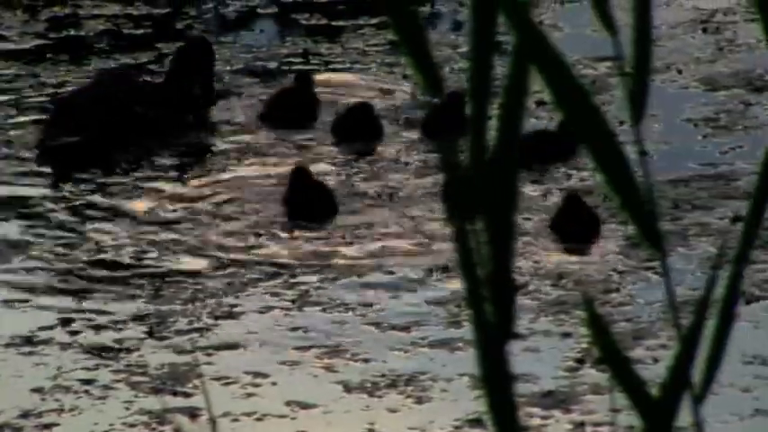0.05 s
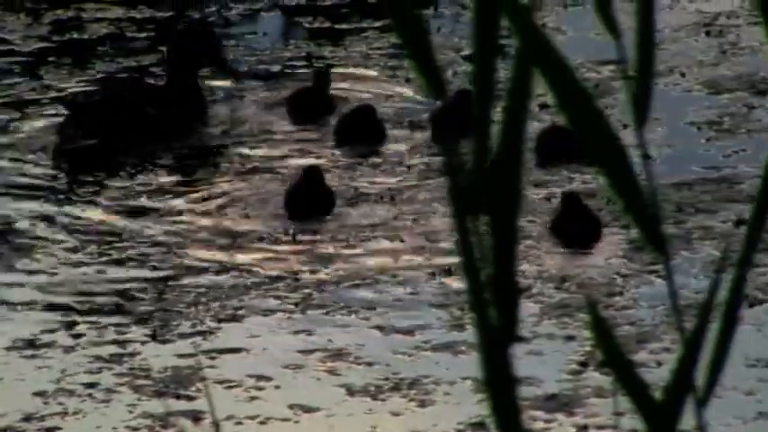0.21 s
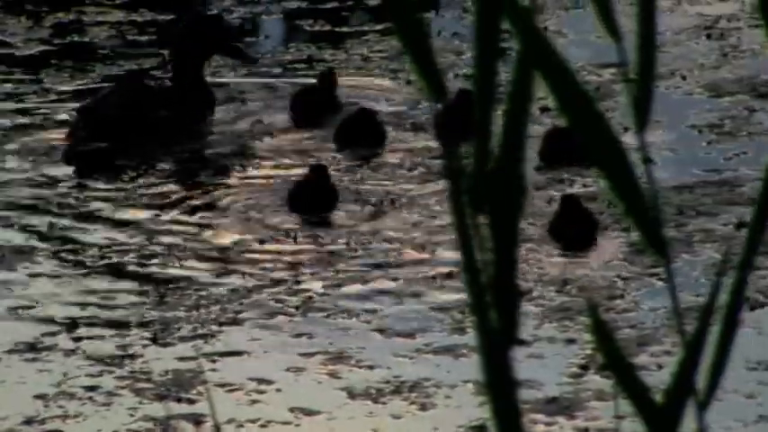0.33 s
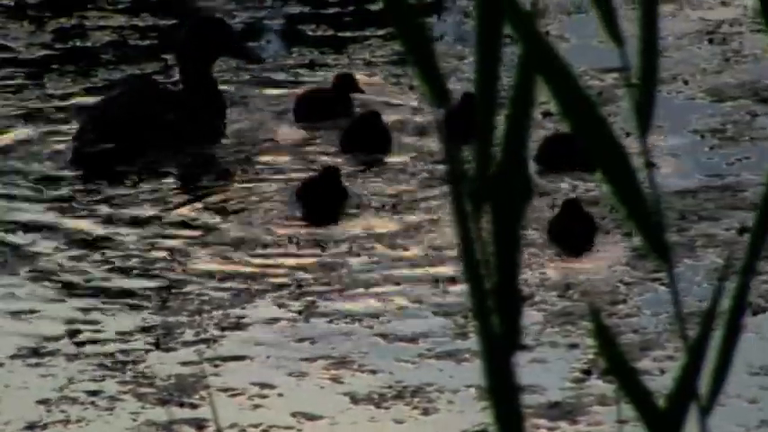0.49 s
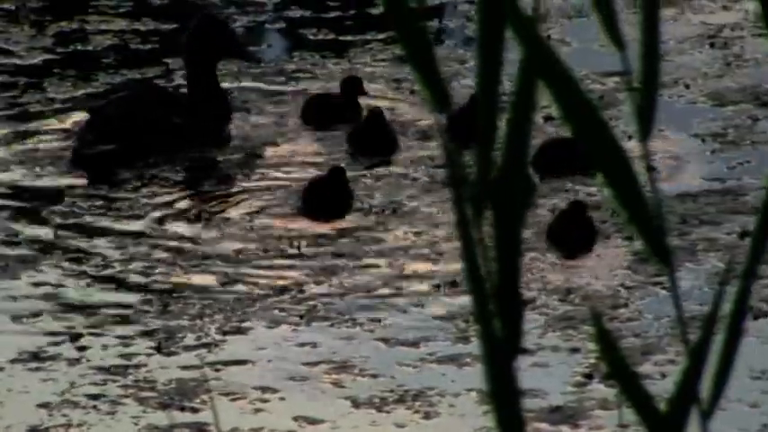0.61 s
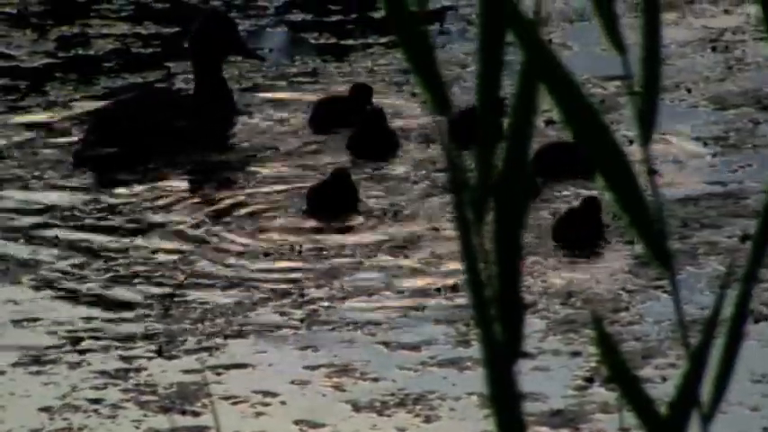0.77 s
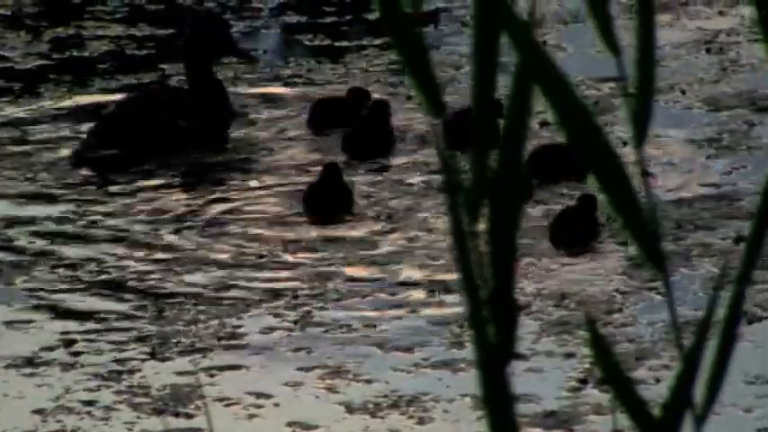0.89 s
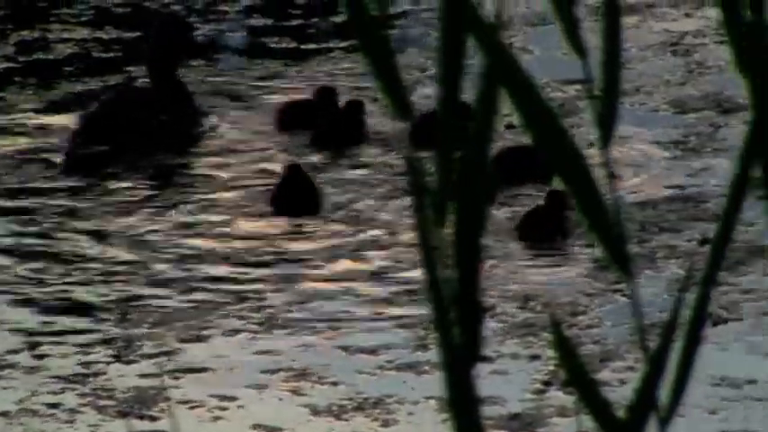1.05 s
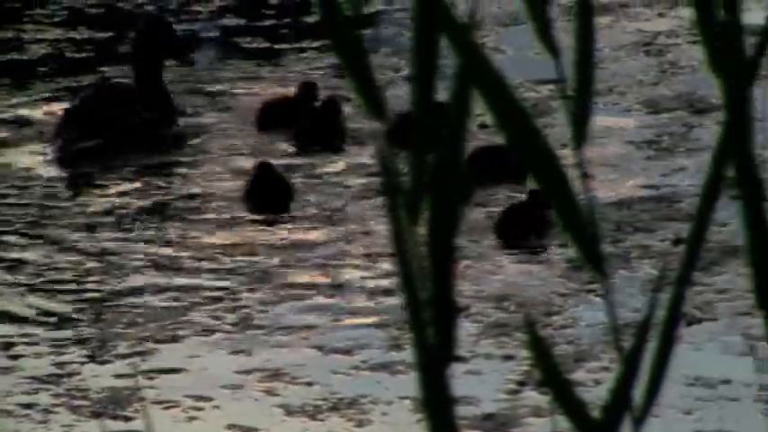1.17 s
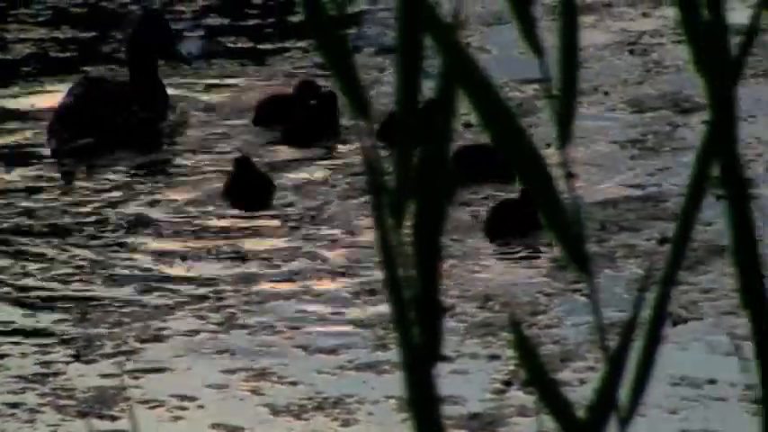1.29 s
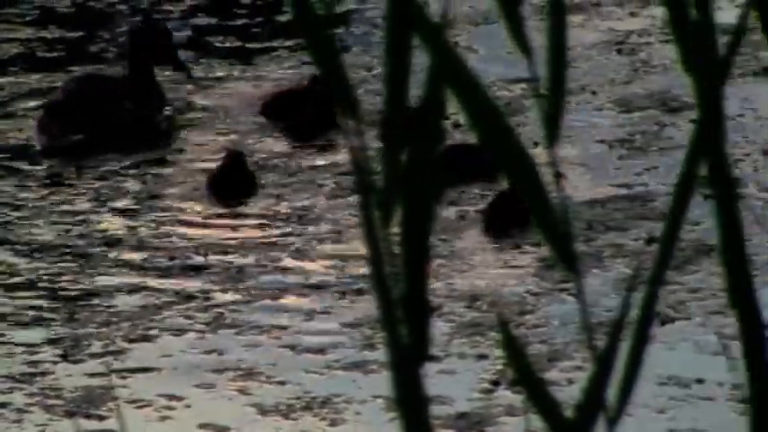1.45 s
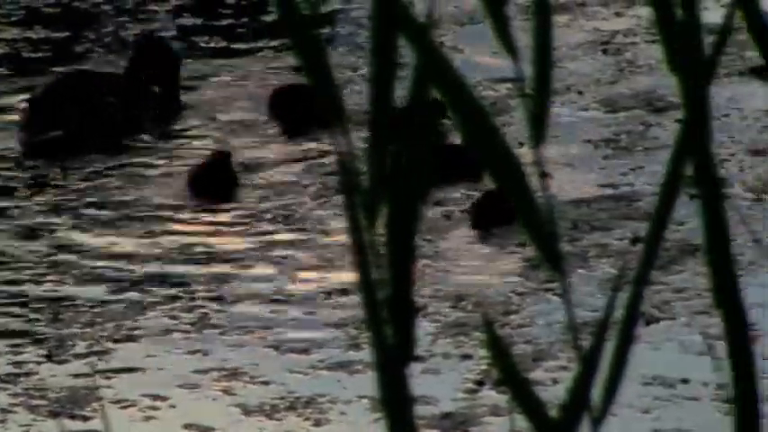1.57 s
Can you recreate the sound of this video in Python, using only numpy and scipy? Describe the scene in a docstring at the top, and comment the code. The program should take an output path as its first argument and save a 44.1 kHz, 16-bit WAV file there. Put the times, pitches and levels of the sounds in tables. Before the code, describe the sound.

Birdsong fills a reedy pond at dusk: a fluting singer warbles over quick sharp chips and thin whistles, while distant birds thicken later. Faint traffic hum, hiss and low breeze rumble surround the outdoor stereo microphones.

```python
"""Dusk at a reedy pond, with chips, slides and whistles from the start over traffic hum, blurred chorus and hiss.
A fluting singer, heard as near-sines on pitch paths, soon enters; a neighbour overlaps it twice early on.
Distant birds, short random glides, are sparse at first, then swell; a far dove hoots early and late.
Late on, the breeze, very slow noise at each microphone, swings hardest. Throughout, dying noise clouds
echo the birds from the trees and water, and a circuit whines faintly."""
import sys
import numpy as np
from scipy import signal
from scipy.fft import rfft, irfft
from scipy.io import wavfile
from scipy.ndimage import uniform_filter1d, map_coordinates

SR = 44100
rng = np.random.default_rng(int(sys.argv[2]) if len(sys.argv) > 2 else 0)


def generate_wav(signal):
    """Clip the signal to [-1, 1] and save it as 16-bit WAV at the path in sys.argv[1]."""
    frames = np.transpose(np.atleast_2d(signal))
    scaled = np.clip(frames, -1, 1) * 32767
    pcm = np.round(scaled).astype(np.int16)
    wavfile.write(sys.argv[1], SR, pcm)


def voltage_ratio(level):
    """Linear amplitude factor for a level in decibels (scalar or array-like)."""
    return 10 ** (np.asarray(level, float) / 20)


N = 72765

# Pitch path of each fluted note, the last two a neighbour's; each point: time_s, pitch_hz
NOTE_PATHS = [
    [(.05, 2200), (.07, 2660), (.098, 2910), (.128, 2870)],
    [(.14, 2860), (.155, 2940), (.178, 2640), (.2, 2820), (.218, 2640), (.236, 2930), (.255, 2700),
     (.285, 2630)],
    [(.35, 2430), (.37, 2700), (.4, 2900), (.415, 2890)],
    [(.41, 2100), (.428, 2350), (.445, 2550), (.47, 2420), (.49, 2150), (.52, 2060)],
    [(.745, 2890), (.775, 2855), (.8, 2790), (.89, 2760)],
    [(.888, 3800), (.905, 3660), (.925, 3590), (.945, 3350)],
    [(.935, 3400), (.958, 3296), (1.022, 3296)],
    [(1.115, 3620), (1.13, 3710), (1.2, 3720), (1.265, 3750)],
    [(1.305, 3000), (1.325, 3200), (1.39, 3510), (1.41, 3420), (1.435, 3520)],
    [(1.465, 3120), (1.485, 3000), (1.503, 2650), (1.52, 2635)],
    [(1.56, 3500), (1.585, 3760), (1.615, 3380), (1.65, 3080)],
    [(.13, 2650), (.165, 2700), (.19, 2950), (.21, 2980), (.235, 2650), (.26, 2950), (.3, 2850)],
    [(.42, 2900), (.445, 2750), (.47, 2850), (.5, 2600), (.55, 2500)],
]
# Effort over each note: level_db at five even steps, left_right_db
NOTE_EFFORT = [(-53.5, -57.5, -52, -54.5, -54, -0.5), (-60, -54, -55.5, -58, -59, 2.5),
               (-50.5, -56, -55, -57, -44, 2), (-55, -59, -58.5, -61.5, -72.5, -3.5),
               (-54, -44.5, -53, -61, -52, 0), (-46, -54, -52.5, -49.5, -46, -3),
               (-59, -53.5, -45, -47.5, -61, -9), (-42, -63, -62.5, -60.5, -63, 3.5),
               (-61.5, -52.5, -55.5, -60, -42.5, -1.5), (-62, -56.5, -53, -48.5, -54, 0.5),
               (-67, -54, -55.5, -55.5, -48, -2.5), (-55, -64, -62.5, -78, -64, -1),
               (-61.5, -56, -61.5, -78, -70, -4)]
# Hoarseness of each note: factor on waver and flutter
NOTE_HOARSENESS = [1.2, 3, .9, 7, .9, .8, .15, .5, 1.8, 1.2, 1.5, 3, 6]
# Echo of each note against the usual, less from a bill turned to the listener: echo_db
NOTE_ECHO = [0, 1, 0, 2, -4, 2, -7, -4, 0, 3, 3, 1, 2]
# Steep falling chips, before gain and fade: start_s, length_s, from_hz, to_hz, level_db, left_right_db
CHIP_NOTES = [(0.0, .022, 6900, 5300, -62, 0), (.385, .036, 7600, 4350, -58, 0),
              (.562, .025, 7000, 5300, -68, 3), (.683, .026, 5300, 4100, -56, -3),
              (.817, .026, 7500, 5350, -56, 0), (1.216, .028, 7200, 4350, -59, 1),
              (1.268, .02, 7300, 6100, -57, -2), (1.623, .036, 7400, 4400, -58, 0),
              (.746, .03, 3300, 2250, -59, -4), (.893, .026, 3300, 2350, -63, -1),
              (1.035, .026, 3200, 2300, -64, -4), (1.18, .026, 3200, 2300, -65, -3)]
# Slides and held whistles, before gain: start_s, length_s, from_hz, to_hz, level_db, left_right_db
WHISTLE_NOTES = [(.005, .04, 5000, 4350, -65, 3), (.02, .1, 5400, 5350, -71, 0),
                 (.15, .1, 7100, 6600, -70, -3), (.174, .03, 6350, 5550, -70, 1),
                 (.205, .03, 4900, 4700, -63, 0), (.24, .025, 5000, 4400, -62, 0),
                 (.28, .022, 5000, 4600, -60, 2), (.547, .02, 4950, 4600, -62, 3),
                 (.585, .018, 5000, 4550, -63, 3), (.621, .024, 5000, 4600, -63, 3),
                 (.145, .025, 3850, 3800, -66, 4), (.275, .09, 4020, 3950, -69, 1),
                 (.365, .02, 4000, 3650, -66, 4), (.325, .095, 6800, 5900, -68, -3),
                 (.24, .09, 6550, 7000, -71, -3), (.44, .12, 7500, 6650, -70, 0),
                 (.43, .105, 4500, 4750, -68, 0), (.56, .05, 5350, 5250, -70, -2),
                 (.555, .025, 3550, 3400, -65, -2), (.585, .035, 3800, 3400, -66, 0),
                 (.59, .082, 2480, 2860, -64, 0), (.67, .035, 3050, 2800, -66, 0),
                 (.0, .05, 2870, 2850, -66, -3), (.11, .02, 1900, 1950, -66, 0),
                 (.71, .065, 7500, 6900, -72, 3), (.935, .145, 7450, 7280, -71, -2),
                 (1.098, .05, 4450, 4500, -64, 0), (1.09, .09, 9700, 9550, -78, 0),
                 (1.2, .07, 7250, 6900, -67, -2), (1.245, .04, 4600, 4700, -65, 0),
                 (1.335, .035, 4550, 4250, -68, 3), (1.392, .048, 6950, 6100, -59, -1),
                 (1.39, .06, 5150, 5250, -70, 0), (1.515, .015, 5000, 4700, -64, 0),
                 (1.47, .13, 6950, 6550, -71, -1), (1.398, .035, 3900, 3250, -58, 0),
                 (1.43, .06, 2600, 2580, -66, 2), (1.59, .06, 3770, 3700, -57, 2),
                 (1.48, .02, 4950, 4700, -67, 0), (1.0, .04, 5700, 7000, -69, -2),
                 (1.145, .025, 5500, 6700, -69, -2), (.85, .03, 5000, 4200, -68, 0),
                 (.9, .04, 6200, 5600, -68, 2)]
# Low pips of one far bird: start_s, level_db
PIP_NOTES = [(.02, -70.5), (.2, -68.5), (.31, -77), (.62, -72), (.69, -75), (.87, -65), (1.02, -67),
             (1.09, -71), (1.25, -65.5), (1.31, -65.5), (1.37, -83), (1.44, -66), (1.5, -72), (1.56, -65),
             (1.62, -68.5)]
# Soft hoots of a far dove: start_s, length_s, pitch_hz, level_db
DOVE_HOOTS = [(.15, 0.11, 517, -71), (1.33, 0.11, 490.6, -73), (1.554, 0.029, 1094, -71.5)]
# How busy the distant crowd is, as added level: time_s, gain_db
CROWD_ACTIVITY = [(0, -1), (.1, -27), (.36, -25), (.42, 5), (.58, -4.5), (.66, 0), (.72, 7.5), (.95, 5.5),
                  (1.05, 9.5), (1.3, 8.5), (1.5, 12), (1.65, -34)]
# Spectrum shape of traffic hum, blurred chorus and microphone hiss: frequency_hz, relative_db_per_hz
AIR_SPECTRUM = [(26, -24), (45, -7.5), (59, -8), (108, -18), (496, -21.5), (752, -26.5), (1650, -28),
                (1980, -24.5), (2170, -27), (2740, -21.5), (3300, -22), (4450, -25.5), (6150, -33),
                (6900, -33.5), (7740, -43.5), (11200, -39.5), (14600, -21), (22000, -120)]
# Correlation of the air between left and right: frequency_hz, correlation (no unit)
AIR_LIKENESS = [(45, 0.079), (140, 0.5), (340, 0.44), (830, 0.65), (1980, 0.7), (4750, 0), (6800, 0),
                (8000, 0.56), (11400, 0.25)]
# Breeze on the microphones: time_s, left_db, right_db
BREEZE_LEVELS = [(0, -54, -53), (.35, -33.5, -71.5), (0.599, -42, -27), (0.796, -23.5, -34),
                 (1.048, -58, -38.5), (1.202, -38, -45), (1.297, -16, -24), (1.42, -35.5, -53.5),
                 (1.65, -46.5, -48.5)]

OVERTONE_DB = -42  # second harmonic against the first
WAVER_SHARE, WAVER_PER_S = .007, 110  # rms pitch waver as a share, its bandwidth in Hz; before hoarseness
FLUTTER_DB, FLUTTER_PER_S = 3.5, 100  # rms level flutter, its bandwidth in Hz; before hoarseness
FLUTTER_MOST = 1.2  # limit of the hoarseness factor on flutter
SONG_EDGE_S, CHIP_EDGE_S, WHISTLE_EDGE_S, HOOT_EDGE_S = .013, .003, .005, .0022
CHIP_GAIN_DB, CHIP_FADE_DB = -.5, -3.5  # the fade is spread over each chip
CHIP_FALL_SHARE, CHIP_BEND = .72, 1.6  # share of its length spent falling, exponent of the fall
WHISTLE_GAIN_DB = -1
PIP_HZ, PIP_S = 2020, .025  # final pitch and length
CROWD_COUNT, CROWD_LOW_HZ, CROWD_HIGH_HZ = 500, 2000, 7200
CROWD_DB, CROWD_SPREAD_DB = -86.5, 2.0  # lowest level before tilt and activity, mean random rise
CROWD_TILT_DB, CROWD_FALL = .5, .12  # rise per octave, greatest fall in pitch as a share
SONG_ECHO_DB, WHISTLE_ECHO_DB, FAR_ECHO_DB = -.5, -5, 3.5  # sends into the echo
ECHO_GAP_S, ECHO_T60_S, ECHO_LIKENESS = .004, .34, .13  # onset time constant, decay, left-right correlation
THICKETS, STIR_SHARE, STIR_PER_S = 6, .3, 30  # clouds, weight of stirring, its bandwidth in Hz
LEFT_LAG_S = .00004
AIR_DB = -59.5  # rms
BREEZE_LOW_HZ, BREEZE_HIGH_HZ = 3.5, 13
WHINE_HZ, WHINE_DB = SR / 4, -78.5  # peak at the left, before the low-pass
SHELF_HZ, SHELF_DB = 11400, 13  # start of the stopband, its least attenuation


def rms_one(x):
    """Normalization: a signal divided by its root mean square has unit power."""
    return x / np.sqrt(np.mean(x ** 2) + 1e-20)


def at_hz(points, hz):
    """Logarithmic frequency: equal ratios are equal steps when the table is interpolated."""
    table = np.array(points, float)
    log_hz = np.log(np.maximum(table[:, 0], 1))
    return np.interp(np.log(np.maximum(hz, 1)), log_hz, table[:, 1])


def wobble(bandwidth_hz):
    """Band limitation: low-passed noise is a slow random motion, here of unit rms."""
    lowpass = signal.butter(2, bandwidth_hz, fs=SR, output="sos")
    return rms_one(signal.sosfilt(lowpass, rng.standard_normal(N + SR)))


def voice_waver():
    """Partial correlation: a shared and an own flutter per side, below a row of pitch waver."""
    shared = wobble(FLUTTER_PER_S)
    flutter = [.8 * shared + .6 * wobble(FLUTTER_PER_S) for side in "LR"]
    return np.array([wobble(WAVER_PER_S)] + flutter)


def add_tone(bus, start_s, hz, level_db, pan_db, edge_s, waver):
    """Frequency modulation: phase is the integral of a wavering pitch; a faint octave enriches the sine."""
    i, n = int(start_s * SR), len(hz)
    t = np.arange(n) / SR
    wavering_hz = hz * (1 + WAVER_SHARE * waver[0, i:i + n])
    phase = 2 * np.pi * np.cumsum(wavering_hz) / SR
    from_edge = np.minimum(t, t[::-1]) / edge_s
    fade = np.sin(np.pi / 2 * np.clip(from_edge, 0, 1)) ** 2
    wave = np.sin(phase) + voltage_ratio(OVERTONE_DB) * np.sin(2 * phase)
    tone = np.sqrt(2) * voltage_ratio(level_db) * fade * wave
    side_db = np.array([[.5], [-.5]]) * pan_db
    bus[:, i:i + n] += tone * voltage_ratio(side_db + FLUTTER_DB * waver[1:, i:i + n])


def straight(u):
    """Uniform glide: the logarithm of pitch changes at a constant rate."""
    return u


def chip_fall(u):
    """Decelerating glide: the pitch falls steeply, then levels out."""
    return 1 - np.maximum(1 - u / CHIP_FALL_SHARE, 0) ** CHIP_BEND


def glides(rows, shape, edge_s, waver, gain_db=0, fade_db=0):
    """Geometric glide: pitch moves by ratio from one value to another along shape(0-1)."""
    bus = np.zeros((2, N + SR))
    for start_s, length_s, from_hz, to_hz, level_db, pan_db in rows:
        u = np.linspace(0, 1, max(int(length_s * SR), 8))
        hz = from_hz * (to_hz / from_hz) ** shape(u)
        add_tone(bus, start_s, hz, level_db + gain_db + fade_db * u, pan_db, edge_s, waver)
    return bus[:, :N]


def fluting_singers(waver):
    """Directivity: the same notes go to the listener and, at other levels, into the trees."""
    direct, sent = np.zeros((2, 2, N + SR))
    notes = zip(NOTE_PATHS, NOTE_EFFORT, NOTE_HOARSENESS, NOTE_ECHO)
    for path, (*effort_db, pan_db), hoarse, echo_db in notes:
        time_s, pitch_hz = np.transpose(path)
        t = np.arange(time_s[0], time_s[-1], 1 / SR)
        hz = uniform_filter1d(np.interp(t, time_s, pitch_hz), size=300, mode="nearest")
        steps_s = np.linspace(time_s[0], time_s[-1], len(effort_db))
        level_db = np.interp(t, steps_s, effort_db)
        flutter = min(hoarse, FLUTTER_MOST)
        rough = waver * np.array([[hoarse], [flutter], [flutter]])
        add_tone(direct, time_s[0], hz, level_db, pan_db, SONG_EDGE_S, rough)
        add_tone(sent, time_s[0], hz, level_db + echo_db, pan_db, SONG_EDGE_S, rough)
    return direct[:, :N], sent[:, :N]


def whistles(waver):
    """Pure tones: near-sines slide at a uniform rate of log pitch, or all but hold."""
    return glides(WHISTLE_NOTES, straight, WHISTLE_EDGE_S, waver, WHISTLE_GAIN_DB)


def chips(waver):
    """Downward chirp: pitch and level fall together within a few hundredths of a second."""
    return glides(CHIP_NOTES, chip_fall, CHIP_EDGE_S, waver, CHIP_GAIN_DB, CHIP_FADE_DB)


def pips(waver):
    """Repetition: a brief tone recurs, each time settling 2 % down to the same pitch."""
    rows = [(start_s, PIP_S, PIP_HZ * 1.02, PIP_HZ, level_db, 0) for start_s, level_db in PIP_NOTES]
    return glides(rows, straight, WHISTLE_EDGE_S, waver)


def dove(waver):
    """Steady tone: each hoot keeps one nominal pitch."""
    rows = [(start_s, length_s, hz, hz, level_db, 0) for start_s, length_s, hz, level_db in DOVE_HOOTS]
    return glides(rows, straight, HOOT_EDGE_S, waver)


def distant_crowd(waver):
    """Superposition: many faint random glides merge into unresolved distant birds."""
    when, pitch, rise, length, fall, place = rng.random((6, CROWD_COUNT))
    start_s = when * N / SR
    length_s = (1 + 2 * length) / 50
    from_hz = CROWD_LOW_HZ * (CROWD_HIGH_HZ / CROWD_LOW_HZ) ** pitch
    to_hz = from_hz * (1 - CROWD_FALL * fall)
    level_db = CROWD_DB - CROWD_SPREAD_DB * np.log(1 - rise)  # exponential spread
    level_db += CROWD_TILT_DB * np.log2(from_hz / CROWD_LOW_HZ)
    level_db += np.interp(start_s, *np.transpose(CROWD_ACTIVITY))
    pan_db = 12 * (place - .5)
    rows = zip(start_s, length_s, from_hz, to_hz, level_db, pan_db)
    return glides(rows, straight, WHISTLE_EDGE_S, waver)


def echoes(sent):
    """Diffuse reflection: each thicket convolves the sound with dying noise, shaken by its own leaves."""
    t = np.arange(SR // 2) / SR
    fade = voltage_ratio(-60 * t / ECHO_T60_S) * (1 - np.exp(-t / ECHO_GAP_S))
    fade /= np.sqrt(THICKETS * np.sum(fade ** 2))
    mono = sent.mean(axis=0, keepdims=True)
    out = np.zeros((2, N))
    for thicket in range(THICKETS):
        shared, *own = rng.standard_normal((3, len(t)))
        cloud = np.sqrt(ECHO_LIKENESS) * shared + np.sqrt(1 - ECHO_LIKENESS) * np.array(own)
        stir = np.sqrt(1 - STIR_SHARE) + np.sqrt(STIR_SHARE) * wobble(STIR_PER_S)[:N]
        out += stir * signal.fftconvolve(mono, cloud * fade, axes=1)[:, :N]
    return out


def air():
    """Spectral shaping: filtered noise, with mid and side weighted for the left-right correlation."""
    hz = np.fft.rfftfreq(N, 1 / SR)
    mid, side = rfft(rng.standard_normal((2, N)))
    likeness = np.clip(at_hz(AIR_LIKENESS, hz), -1, 1)
    both = np.sqrt(1 + likeness) * mid + np.sqrt(1 - likeness) * side * np.array([[1], [-1]])
    return voltage_ratio(AIR_DB) * rms_one(irfft(voltage_ratio(at_hz(AIR_SPECTRUM, hz)) * both, N))


def breeze():
    """Pressure fluctuation: independent very slow noise rocks each microphone at its own level."""
    time_s, left_db, right_db = np.transpose(BREEZE_LEVELS)
    t = np.arange(N) / SR
    highpass = signal.butter(1, BREEZE_LOW_HZ, "high", fs=SR, output="sos")
    lowpass = signal.butter(6, BREEZE_HIGH_HZ, fs=SR, output="sos")
    swings = signal.sosfilt(highpass, rng.standard_normal((2, N + SR)))
    swings = signal.sosfilt(lowpass, swings)[:, SR:]  # the first second lets the filters settle
    level_db = [uniform_filter1d(np.interp(t, time_s, db), size=4000) for db in (left_db, right_db)]
    return voltage_ratio(np.array(level_db)) * rms_one(swings)


def circuit_whine():
    """Electrical interference: a steady sine reaches the right channel more weakly."""
    t = np.arange(N) / SR
    return voltage_ratio(WHINE_DB) * np.sin(2 * np.pi * WHINE_HZ * t + 1) * np.array([[1], [.6]])


def scene():
    """Superposition: direct voices, later at the left, join echoes (most from far birds), air and breeze."""
    waver = voice_waver()
    near, sent = fluting_singers(waver)
    middle = whistles(waver)
    far = chips(waver) + pips(waver) + dove(waver) + distant_crowd(waver)
    voices = near + middle + far
    voices[0] = map_coordinates(voices[0], [np.arange(N) - LEFT_LAG_S * SR], order=3)
    to_trees = voltage_ratio(SONG_ECHO_DB) * sent + voltage_ratio(WHISTLE_ECHO_DB) * middle + voltage_ratio(FAR_ECHO_DB) * far
    return voices + echoes(to_trees) + air() + breeze()


def band_limit(x):
    """A steep low-pass at the top of the band."""
    return signal.sosfilt(signal.butter(12, 11990, fs=SR, output="sos"), x)


def record(dry):
    """Band limitation: the sound and a circuit whine pass a low-pass that shelves the top."""
    lowpass = signal.cheby2(6, SHELF_DB, SHELF_HZ, fs=SR, output="sos")
    mix = signal.sosfilt(lowpass, dry + circuit_whine())
    return band_limit(mix)


dry = scene()
out = record(dry)
generate_wav(out)
```